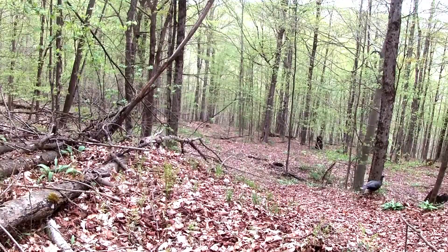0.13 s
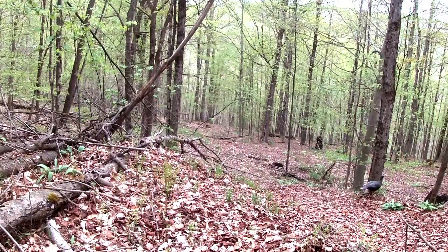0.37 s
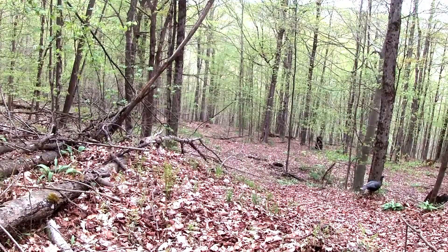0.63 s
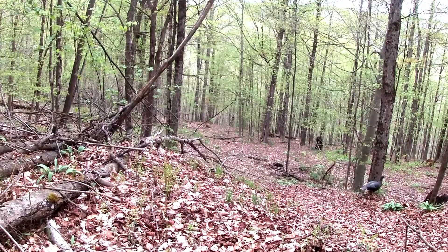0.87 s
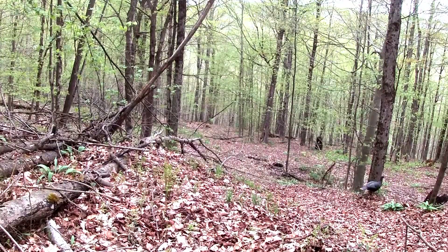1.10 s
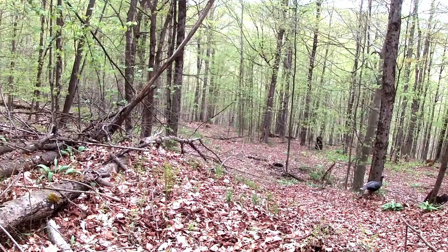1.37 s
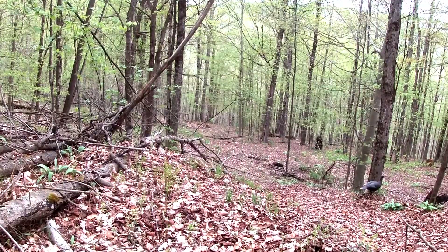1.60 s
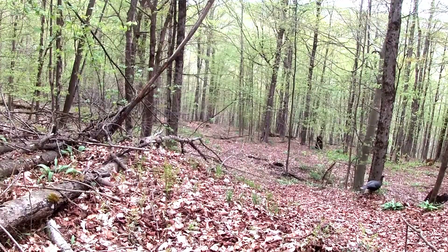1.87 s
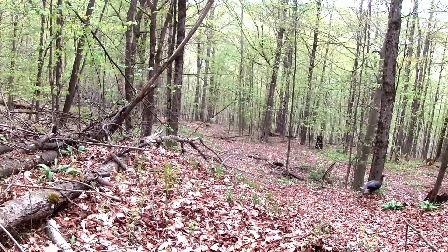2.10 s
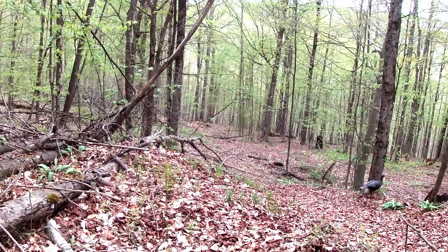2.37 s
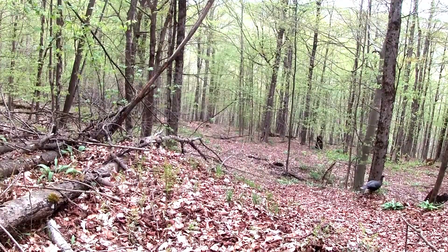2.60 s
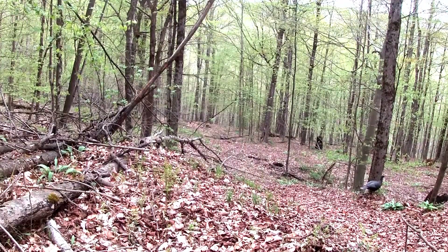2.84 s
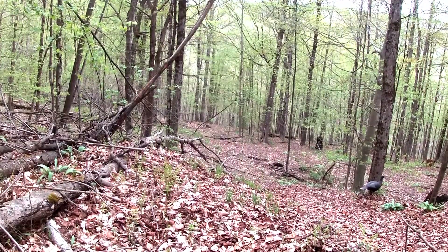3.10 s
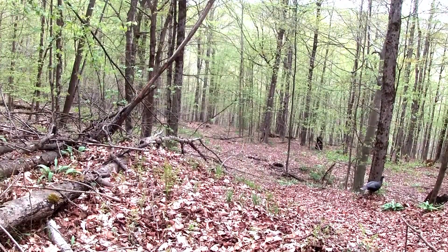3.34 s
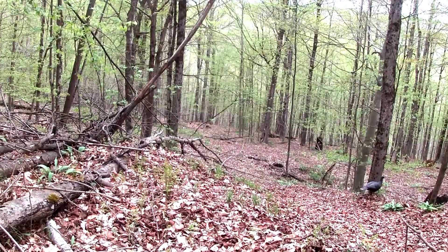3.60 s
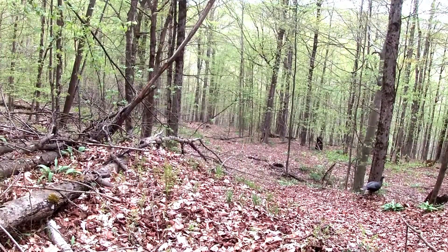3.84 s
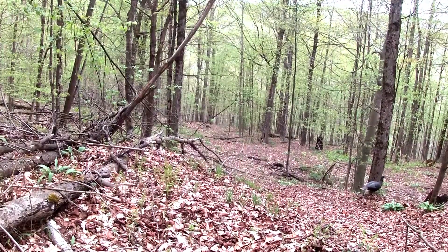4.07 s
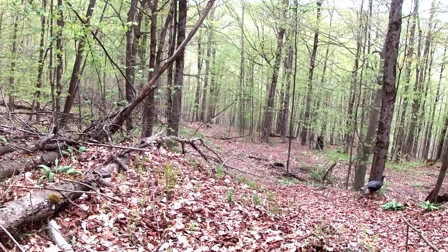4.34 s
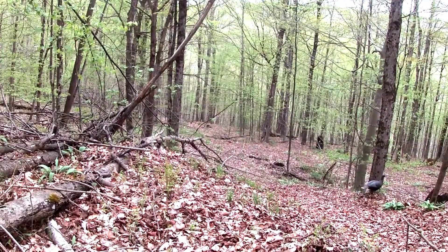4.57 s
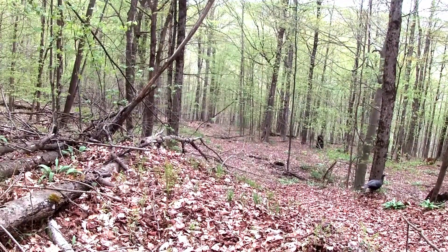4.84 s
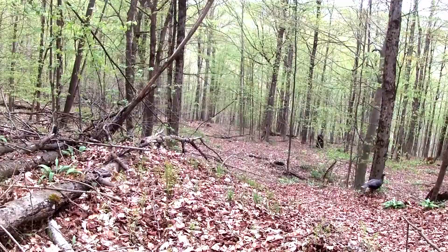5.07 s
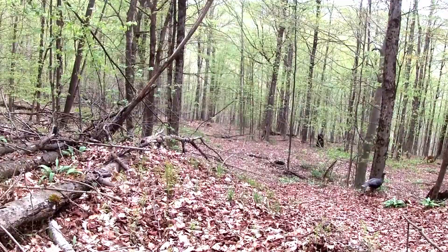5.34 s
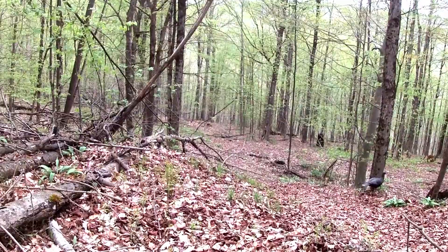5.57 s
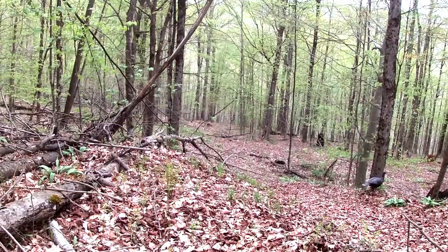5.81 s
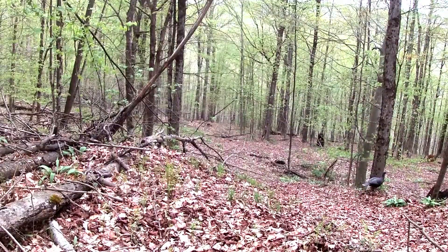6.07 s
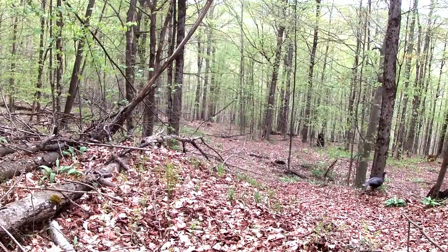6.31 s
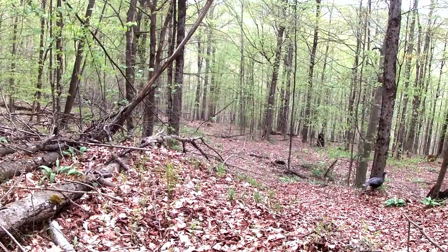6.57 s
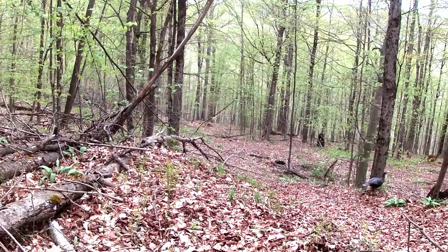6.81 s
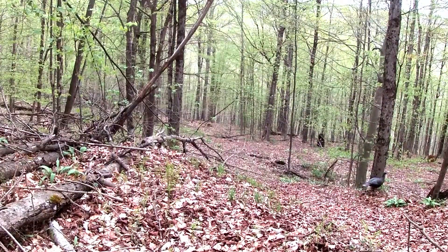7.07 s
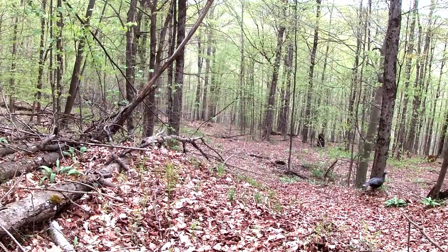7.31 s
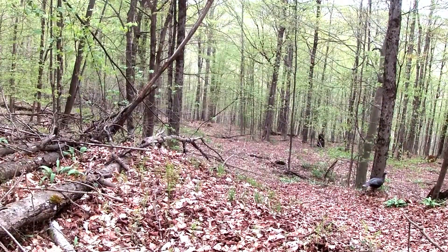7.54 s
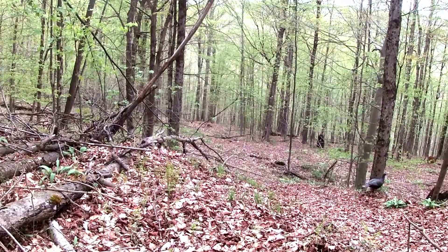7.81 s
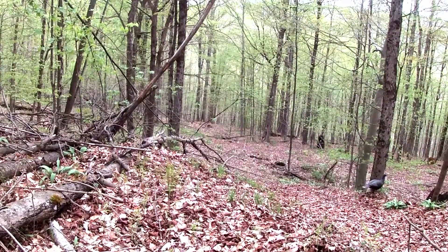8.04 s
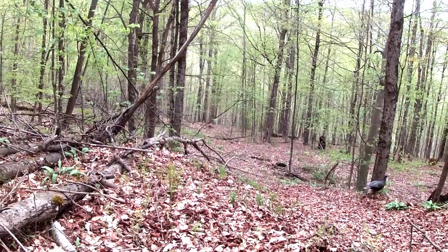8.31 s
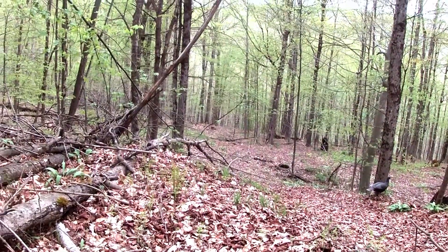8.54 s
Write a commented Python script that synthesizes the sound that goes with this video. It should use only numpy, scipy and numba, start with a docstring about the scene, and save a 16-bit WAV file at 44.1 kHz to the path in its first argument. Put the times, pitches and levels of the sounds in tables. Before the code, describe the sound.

Quiet spring woodland with soft whistles and leaf rustle, then seven loud, scratchy turkey-call yelps close by, woodland echoes, and a faint far-off gobble.

```python
"""Turkey caller in spring woodland

Close to the microphone a friction caller cuts seven sharp, raspy notes: stick-slip pulses ring its body.
The trunks echo them as a noise tail; a far gobbler, noise-roughened tones, answers. Songbirds whistle
(gliding sines), hoarse low notes murmur far off (rough bands), leaves tick and wind puffs thump the
microphone (short wavelets). Behind lie filtered-noise hiss, rustle and rumble, and a wavering hum."""
import sys
import numpy as np
from scipy import signal
from scipy.fft import rfft, irfft, next_fast_len
from scipy.io import wavfile
from scipy.ndimage import uniform_filter1d
from numba import njit

SR = 44100
rng = np.random.default_rng(int(sys.argv[2]) if len(sys.argv) > 2 else 0)


def nominal_scale(level):
    """Amplitude ratio for a level in decibels (scalar or array-like)."""
    x = np.asarray(level, float) / 20
    return 10 ** x


def transcribe(u):
    """Save the signal u as a 16-bit wav file named by the first command-line argument.

    u: samples, shape (n,) or (channels, n), limited to [-1, 1]; the rate is SR.
    q: integer samples, one column per channel.
    """
    v = np.clip(np.atleast_2d(u).T, -1, 1)
    q = np.round(v * 32767).astype(np.int16)
    wavfile.write(sys.argv[1], SR, q)


N = 382347
T = np.arange(N) / SR
LEFT_RIGHT = np.array([[1], [-1]])

# Caller notes: start_s, steady_s, tail_s, level_db (of the slips), settled_slip_hz, tail_slip_hz
NOTES = [(5.386, .024, 0.016, -12, 1369, 1720), (5.520, 0.026, 0.03, -13.5, 1560, 1482),
         (5.738, 0.03413, 0.014, -15.5, 1492, 1533), (6.028, 0.033, 0.013, -15.5, 1472, 1470),
         (6.392, 0.0323, 0.011, -14, 1463, 1494), (6.754, 0.03723, 0.0059, -14.5, 1536, 1638),
         (7.130, .032, 0.0086, -15.5, 1529, 1491)]
# Striker on the surface, per note: landing_scratch_db, bite_roughness (0-1), steady_roughness (0-1),
# weakening of every other slip (0-1)
TOUCH = [(-54.5, 0.13, 0.2, 0.68), (-61, 0.33, 0.16, 0.53), (-67, .7, 0.05, 0.71), (-57, 0.74, 0.25, 0.77),
         (-59, .25, 0.27, 0.68), (-62, 0.65, 0.14, 0.7), (-58, .5, 0.07, 0.7)]
# Brightness of each note, gain of the upper body modes: at 2.4-4.3 kHz (dB), at 4.3-7 kHz (dB), above (dB)
BRIGHTNESS = [(-3, 12.5, 3), (-3.5, 12.5, -0.5), (1, 12.5, -0.5), (0.5, 5, -2), (0.5, 11, 2),
              (4, 9.5, -0.5), (4.5, 11, 3.5)]
# The striker stumbles early in a stroke: centre_s, dip_db
STUMBLES = [(5.393, -22), (6.403, -30)]
# Resonances of the caller's body: centre_hz, width_hz (before widening of the high modes), relative_db
BODY = [(454, 56, -14), (780, 74, -11.5), (1237, 260, 3), (1528, 170, 3.5), (1863, 222, 7.5), (2200, 85, 1),
        (2497, 125, 0), (2940, 79, -4.5), (3500, 340, 0.5), (3906, 170, -2), (4600, 1200, -25.5),
        (5550, 410, -32.5), (8280, 990, -10.5), (9500, 790, -16), (12380, 890, -30.5)]
# Edges of the four groups of body modes: edge_hz
GROUPS_HZ = [0, 2400, 4300, 7000, 20000]
# Far gobble: time_s, throat_resonance_hz, relative_db
GOBBLE = [(7.24, 1747, -63), (7.3, 1694, -60.5), (7.38, 1355, -63.5), (7.6, 1100, -66.5), (7.8, 993.4, -64),
          (7.939, 991, -67), (8.05, 854, -69.5), (8.67, 734.5, -71)]
# Songbird whistles, level or gliding: start_s, length_s, start_hz, end_hz, relative_db
WHISTLES = [(0.028, 0.089, 2285, 2310, -60.5), (1.037, 0.054, 4800, 3610, -57),
            (1.539, 0.057, 2550, 2080, -65.5), (1.413, 0.085, 2600, 2720, -58.5),
            (1.794, 0.16, 2716, 2731, -62), (2.473, 0.067, 4850, 3500, -56.5),
            (2.716, .085, 2230, 1840, -63), (3.353, 0.62, 2640, 2628, -71), (4.164, 0.05, 4800, 3650, -57),
            (4.171, .045, 2510, 2070, -64), (4.952, 0.024, 5500, 4600, -58),
            (5.04, 0.0176, 5200, 5600, -60), (5.171, 0.022, 5550, 4480, -56),
            (5.258, 0.0275, 5500, 5070, -64), (5.307, 0.04, 3370, 4890, -66),
            (5.66, 0.045, 4500, 5260, -63), (5.937, .054, 2810, 2530, -58),
            (7.49, 0.0209, 4020, 3130, -57.5), (7.499, .03, 2720, 2200, -58),
            (7.779, 0.067, 2550, 2840, -60), (7.872, 0.064, 2730, 2250, -60.5),
            (7.757, 0.075, 3780, 3800, -66), (6.222, 0.0099, 2550, 2400, -53)]
# Arched whistles: start_s, length_s, top_hz, relative_db
ARCHES = [(4.077, 0.07, 2735, -58), (8.027, 0.053, 2755, -53), (8.268, 0.089, 2700, -59.5)]
# Far hoarse low notes, half lost in the hiss: start_s, length_s, pitch_hz, relative_db,
# out_of_step_db (side relative to middle)
MURMURS = [(0, 0.061, 729, -56, 3), (0.176, 0.07, 760, -55.5, 6), (0.435, 0.332, 740, -60.5, 5),
           (0.77, 0.19, 760, -56, 3), (0.987, 0.28, 770, -58, 7.5), (1.1, 1.94, 980, -68, 0),
           (1.69, 0.228, 680, -62, 8), (2.157, 0.044, 780, -57, 2), (2.58, 0.24, 730, -59, 3),
           (2.814, 0.16, 750, -56, 3), (3.082, 0.11, 720, -56.5, 6), (8.032, 0.13, 560, -63, 10),
           (8.192, 0.34, 560, -65, 12), (8.61, .08, 540, -64, 11.5)]
# Dry leaf ticks: centre_s, envelope_peak_db, pitch_hz, left_minus_right_db
TICKS = [(3.7199, -57, 5050, 0.5), (4.2562, -43.5, 9690, 0.0), (4.5685, -44, 9010, 0.0),
         (5.1088, -40, 8800, 0.5), (5.2155, -47, 6120, -2), (6.9277, -45, 5630, 10.5),
         (7.1102, -41, 7350, 14.5), (7.6864, -43, 6700, 14.5), (7.9563, -45, 5900, 0.5),
         (8.1948, -32.5, 8885, 0.5), (8.4432, -39, 5840, 0.0), (8.4986, -37.5, 9310, 0.0),
         (8.5589, -42, 8400, 0.0)]
# Wind puffs on the microphone: centre_s, envelope_peak_db, pitch_hz, left_minus_right_db
PUFFS = [(.19, -50, 49, 4.5), (4.08, -55, 40, 0), (4.57, -54, 65, 0), (5.69, -59, 109, 12),
         (6.35, -50, 109, -24), (7.96, -48, 44.8, 0), (8.0, -58, 140.1, -16), (8.05, -40, 31, -2),
         (8.11, -41, 50.5, 3), (8.15, -35, 42, -3), (8.20, -43, 60.3, -1), (8.24, -37, 42, -2),
         (8.30, -37, 34.8, -3)]
# Spectrum of the wood's steady hiss, middle: frequency_hz, relative density (dB per Hz)
HISS_MID = [(18, -49), (30, -21), (75, -19), (123, -8), (361, -16), (401, -13.5), (469, -12.5),
            (521, -17.5), (600, -12.5), (1100, -12.5), (1980, -20), (2570, -22), (8800, -28.5),
            (15700, -69.5)]
# The same for the side, left against right: frequency_hz, relative density (dB per Hz)
HISS_SIDE = [(18, -43), (30, -35), (64, -39), (123, -36.5), (160, -4.5), (361, 0), (507, 2), (926, -2),
             (1140, -4), (8800, -31), (15700, -64.5)]
# Varying hiss around 3-4 kHz and rustle of dry leaves: time_s, mid_hiss_relative_db, rustle_relative_db
HISS_AND_RUSTLE = [(0, -65, -70.5), (.4, -86, -69), (1.0, -63.5, -69), (1.4, -81, -67.5), (2.0, -72, -68),
                   (2.5, -66.5, -67.5), (3.2, -69, -69), (3.6, -66.5, -66.5), (4.1, -65, -70),
                   (4.45, -68.5, -64), (4.75, -82, -69.5), (5.0, -62.5, -62), (5.3, -68, -67.5),
                   (5.9, -68, -66), (6.35, -70, -67), (6.8, -64, -65), (7.45, -65, -69), (7.68, -62, -64.5),
                   (7.9, -70.5, -71), (8.17, -60.5, -61), (8.35, -66, -69), (8.67, -59.5, -63)]
# The hum swells and fades: time_s, relative_db
HUM = [(0.0, -72), (1.13, -81.5), (1.45, -65), (1.59, -72), (1.93, -63.5), (2.63, -69), (2.99, -59.5),
       (3.14, -70.5), (3.47, -63.5), (3.86, -70.5), (4.2, -62.5), (5.63, -70.5), (6.3, -62.5), (8.11, -71),
       (8.14, -66), (8.67, -67)]
# Wind rumble on the microphone: time_s, relative_db
RUMBLE = [(0, -63), (.6, -71), (2.4, -69.5), (3.2, -64.5), (5.6, -65.5), (6.1, -74), (7.4, -69), (7.9, -62),
          (8.17, -53.5), (8.4, -62), (8.67, -61)]


def level(x, db):
    """Scale to an rms level in dB."""
    return x * nominal_scale(db) / np.sqrt(np.mean(x ** 2))


def ring(x, hz, width):
    """Two-pole resonance, gain 1 at the centre."""
    return signal.lfilter(*signal.iirpeak(hz, hz / width, fs=SR), x)


def lowpass(x, order, hz):
    """Butterworth filter that keeps what lies below hz."""
    return signal.sosfilt(signal.butter(order, hz, fs=SR, output="sos"), x)


def tone(hz):
    """Steady sine over the whole scene."""
    return np.sin(2 * np.pi * hz * T)


def hoarse(hz_wide):
    """Low-passed noise: a carrier multiplied by it becomes a rough band."""
    return level(lowpass(rng.standard_normal(N), 3, hz_wide), 0)


def walk(rate):
    """Random levels held 1 / rate s, then smoothed twice over that time."""
    hold = int(SR / rate)
    steps = np.repeat(rng.standard_normal(N // hold + 1), hold)
    return uniform_filter1d(uniform_filter1d(steps, hold), hold)[:N]


def pan(db):
    """Channel gains for a left-minus-right level."""
    return nominal_scale(LEFT_RIGHT * db / 2)


def caller():
    """Stick-slip pulses ring the body; the rubbing grit hisses with the roughness."""
    drive, bright = np.zeros(N), np.ones((3, N))
    for (start_s, *note), (scratch_db, *touch), bright_db in zip(NOTES, TOUCH, BRIGHTNESS):
        hz, db, uneven, rough = stroke(*note, *touch)
        first = int(start_s * SR)
        span = slice(first, first + len(hz))
        for at, dip_db in STUMBLES:
            db = db + dip_db * np.exp(-((T[span] - at) / 0.0011) ** 2)
        chance = rng.standard_normal((200, 2))
        drive[span] = slips(hz, nominal_scale(db), uneven, rough, chance, 0.3, 0.4)
        grit = rough * rng.standard_normal(len(hz))
        drive[span] += nominal_scale(db - 20.5) * grit
        bright[:, span] = nominal_scale(np.array(bright_db))[:, None]
        # the striker lands with a faint scratch just before it slips
        k = int((start_s - 0.006) * SR)
        drive[k:k + 160] += nominal_scale(scratch_db) * np.hanning(160) * rng.standard_normal(160)
    return body(drive, bright)


def stroke(steady_s, tail_s, db, hz, tail_hz, bite_rough, steady_rough, uneven):
    """One stroke as (slip rate, dB, alternation, roughness): bite, settle, catch, ragged tail, release."""
    attack_s, attack_db, fade_db_per_s, release_db_per_s = 0.0071, -19.5, -150, -2600
    catch_s, catch_db, tail_db, tail_fade_db_per_s = 0.0011, -10, -2.5, -150
    overshoot, settle_s, calm_s = 0.15, 0.009, 0.011  # overshoot: share by which the slip rate starts high
    tail_rough, tail_uneven = 0.59, 0.21
    u = T[:int((steady_s + tail_s + 0.016) * SR)]
    since_catch = u - steady_s
    late = np.clip(since_catch / catch_s / 2 + 0.5, 0, 1)
    db = db + attack_db * np.clip(1 - u / attack_s, 0, 1) + fade_db_per_s * u
    # the striker catches between steady part and tail
    db = db + catch_db * np.exp(-(since_catch / catch_s) ** 2)
    db = db + late * (tail_db + tail_fade_db_per_s * since_catch)
    db = db + release_db_per_s * np.maximum(since_catch - tail_s, 0)
    rough = steady_rough + (bite_rough - steady_rough) * np.exp(-u / calm_s)
    hz = hz * (1 + overshoot * np.exp(-u / settle_s))

    def blend(steady, tail):
        return steady + late * (tail - steady)

    return blend(hz, tail_hz), db, blend(uneven, tail_uneven), blend(rough, tail_rough)


@njit
def slips(hz, gain, uneven, rough, chance, jitter, scatter):
    """A pulse at each wrap of the phase; every other one is weaker; roughness scatters period and size."""
    out, phase, count, stretch = np.zeros(len(hz) + 1), 0., 0, 1.
    for i in range(len(hz)):
        step = hz[i] * stretch / SR
        phase += step
        if phase >= 1:
            phase, count = phase - 1, count + 1
            size = gain[i] * (1 - uneven[i] * (count % 2))
            size *= np.exp(scatter * rough[i] * chance[count, 0])
            # share the pulse between two samples for exact timing
            out[i] += size * phase / step
            out[i + 1] += size * (1 - phase / step)
            stretch = np.exp(jitter * rough[i] * chance[count, 1])
    return out[:-1]


def body(drive, bright):
    """Low modes swing against a limit, high modes ring freely; each note weights the upper modes differently."""
    def group(k):
        return [mode for mode in BODY if GROUPS_HZ[k] < mode[0] <= GROUPS_HZ[k + 1]]

    swing, high = np.zeros(N), np.zeros(N)
    for k, push in enumerate([drive, drive * bright[0]]):
        for hz, width, db in group(k):
            swing += nominal_scale(27.0 + db) * ring(push, hz, width)
    # the swing has a limit, tighter inwards than outwards, and the wall passes it between two corners
    limit = np.where(swing > 0, 0.5, 0.25)
    swing = lowpass(limit * np.tanh(swing / limit), 6, 3610)
    swing = signal.sosfilt(signal.butter(3, 150, "high", fs=SR, output="sos"), swing)
    # the high modes stand apart, with deep valleys between them
    for k in (2, 3):
        for hz, width, db in group(k):
            wide = 1.44 * width
            high += nominal_scale(23.5 + db) * ring(ring(drive * bright[k - 1], hz, wide), hz, wide)
    # two paths out of the body cancel in one band
    return signal.lfilter(*signal.iirnotch(6200, 6, fs=SR), swing + high)


def wood(t60, lowpass_hz):
    """Scatter off many trunks ahead: a noise tail, nearly alike left and right."""
    t = T[:int(t60 * SR)]
    decay = np.exp(-np.log(1000) * t / t60)
    build = 1 - np.exp(-t / 0.02)
    mid, side = rng.standard_normal((2, len(t))) * decay * build
    tail = lowpass(mid + LEFT_RIGHT * nominal_scale(-16) * side, 1, lowpass_hz)
    return tail / np.sqrt(np.sum(tail ** 2) / 2)


def through_wood(x, t60, lowpass_hz):
    """The woodland tail of a sound, without the direct sound."""
    return signal.fftconvolve(np.atleast_2d(x), wood(t60, lowpass_hz), axes=1)[:, :N]


def echoes(x):
    """Many trunks answer with one smeared tail."""
    # bark and branches scatter short waves best
    x = x + nominal_scale(2) * ring(x, 4170, 600)
    return nominal_scale(-32.5) * through_wood(x, 0.7, 11300)


def gobbler():
    """Hoarse throbbing voice: throat bands sink together, two higher ones stay; blurred by distance."""
    s, hz, db = np.transpose(GOBBLE)
    u = np.maximum(T - s[0], 0)
    turn = 2 * np.pi * np.cumsum(np.interp(T, s, hz)) / SR
    throat = hoarse(139) * np.sin(turn)
    throat += nominal_scale(-0.5) * hoarse(262) * np.sin(0.89 * turn)
    throat += nominal_scale(-4.0) * hoarse(170) * np.sin(1.3 * turn)
    # the upper resonances drop at 7.94 s; the throat trails on
    upper_db = -66 - 5 * u - 7 * (T > 7.94)
    upper = hoarse(180) * tone(1800) + nominal_scale(-4) * hoarse(250) * tone(3550)
    voice = nominal_scale(np.interp(T, s, db)) * throat + nominal_scale(upper_db) * upper
    throb = 1 + 0.19 * tone(13)
    voice = voice * np.minimum(u / (s[1] - s[0]), 1) * throb
    return nominal_scale(5.5) * voice + nominal_scale(-4.0) * through_wood(voice, 0.17, 2000)


def songbirds():
    """Sine whistles, straight or arched, with a woodland tail."""
    out = np.zeros(N)
    straight = [(s, length, a, (a + c) / 2, c, db) for s, length, a, c, db in WHISTLES]
    # arches start and end at these shares of the top pitch
    arched = [(s, length, 0.942 * top, top, 0.87 * top, db) for s, length, top, db in ARCHES]
    for s, length, start_hz, middle_hz, end_hz, db in straight + arched:
        u = np.linspace(-1, 1, int(length * SR))
        bend = (start_hz + end_hz) / 2 - middle_hz
        hz = middle_hz + (end_hz - start_hz) / 2 * u + bend * u ** 2
        k = int(s * SR)
        out[k:k + len(u)] += nominal_scale(db) * np.sqrt(1 - u ** 2) * np.sin(2 * np.pi * np.cumsum(hz) / SR)
    # leaves and moving air make far whistles flutter
    out = out * nominal_scale(1.2 * walk(40)) * (1 + 0.35 * hoarse(250))
    return out * pan(-1.5) * nominal_scale(-1.5) + nominal_scale(-7.0) * through_wood(out, 0.89, 9600)


def murmurs():
    """Far hoarse notes: rough bands that swell and fade, with a woodland tail."""
    out, mid, side = np.zeros((2, N)), hoarse(80), hoarse(140)
    for s, length, hz, db, side_db in MURMURS:
        span = slice(int(s * SR), int((s + length) * SR))
        swell = np.sqrt(np.hanning(len(T[span])))
        rough = mid[span] + LEFT_RIGHT * nominal_scale(side_db) * side[span]
        out[:, span] += nominal_scale(db) * swell * np.sin(2 * np.pi * hz * T[span]) * rough
    return out + nominal_scale(-9.5) * through_wood(out, 0.7, 3700)


def wavelets(table, cycles):
    """Short bell-shaped bursts of a few cycles, each with its own phase."""
    out = np.zeros((2, N))
    for s, db, hz, pan_db in table:
        span = slice(max(int((s - 2 * cycles / hz) * SR), 0), int((s + 2 * cycles / hz) * SR))
        u = (T[span] - s) * hz
        wave = np.cos(2 * np.pi * u + rng.uniform(0, 2 * np.pi))
        out[:, span] += pan(pan_db) * nominal_scale(db) * np.exp(-(2 * u / cycles) ** 2) * wave
    return out


def leaf_ticks():
    """Dry leaves tick: wavelets of nearly three cycles."""
    return wavelets(TICKS, 2.84)


def wind_puffs():
    """Puffs thump the microphone: low wavelets of little more than one cycle."""
    return wavelets(PUFFS, 1.33)


def noise():
    """White noise in one channel."""
    return rng.standard_normal(N)


def band(x, hz, width, db):
    """Twice-resonated band at an rms level."""
    return level(ring(ring(x, hz, width), hz, width), db)


def colour(shape):
    """Noise with a (Hz, dB) spectrum."""
    hz, db = np.transpose(shape)
    size = next_fast_len(N)
    f = np.arange(1, size // 2 + 2) * SR / size
    gain = nominal_scale(np.interp(np.log(f), np.log(hz), db))
    return irfft(rfft(rng.standard_normal(size)) * gain, size)[:N]


def rustle():
    """Dry leaves: tiny random crackles in two bands over a wide side hiss, with a flickering level."""
    s, _, db = np.transpose(HISS_AND_RUSTLE)
    flicker = nominal_scale(1.5 * walk(12))
    crackle = noise() * nominal_scale(2.2 * rng.exponential(1, N) * (rng.random(N) < 0.02))
    mid = band(crackle, 9030, 4200, -4.03) + band(crackle, 5100, 1140, -5.5)
    side = band(noise(), 5200, 7400, -4.5)
    return nominal_scale(np.interp(T, s, db)) * flicker * (mid + LEFT_RIGHT * side)


def mid_hiss():
    """Varying hiss around 3-4 kHz: a broad noise band that comes and goes."""
    s, db, _ = np.transpose(HISS_AND_RUSTLE)
    broad = band(noise(), 3880, 5620, 0) + LEFT_RIGHT * band(noise(), 3100, 3700, -21.0)
    return nominal_scale(np.interp(T, s, db)) * broad


def hum():
    """A tone near 120 Hz with two overtones, wavering in pitch and level."""
    turn = 2 * np.pi * np.cumsum(120 + 2.326 * walk(5.0)) / SR
    swell = np.sqrt(2) * nominal_scale(np.interp(T, *np.transpose(HUM)))
    waver = nominal_scale(2 * walk(12))
    # the hum reaches the two microphone ports out of step
    tones = np.sin(turn + 0.4 * LEFT_RIGHT)
    tones = tones + nominal_scale(-9) * np.sin(2 * turn + 1.2 * LEFT_RIGHT) + nominal_scale(-14) * np.sin(4 * turn)
    return swell * waver * pan(-2.5) * tones


def rumble():
    """Wind on the microphone: low noise bands with slow and quick gusts."""
    wind = nominal_scale(np.interp(T, *np.transpose(RUMBLE)) + 2.0 * walk(4))
    gusts = nominal_scale(2.5 * walk(14))
    return wind * gusts * (band(noise(), 23.4, 68, 0) + LEFT_RIGHT * band(noise(), 71, 65, -16.5))


def hiss():
    """Steady hiss of the wood: shaped noise, plus a faint separate band in each channel."""
    mid, side = level(colour(HISS_MID), -59.5), level(colour(HISS_SIDE), -58.5)
    return mid + LEFT_RIGHT * side + band(rng.standard_normal((2, N)), 13800, 5000, -80.5)


def scene():
    """All sources summed at the microphone: calls, echoes, gobble, whistles, murmurs, ticks, puffs, background."""
    notes = caller()
    voices = notes + echoes(notes) + gobbler() + songbirds() + murmurs()
    background = rustle() + mid_hiss() + hum() + rumble() + hiss()
    return voices + leaf_ticks() + wind_puffs() + background


def low_pass(x):
    """Removes everything above the highest recorded frequency."""
    return signal.sosfilt(signal.butter(12, 15810, fs=SR, output="sos"), x)


def record(dry):
    """The finished mix as it is stored."""
    return low_pass(dry)


dry = scene()
out = record(dry)
transcribe(out)
```